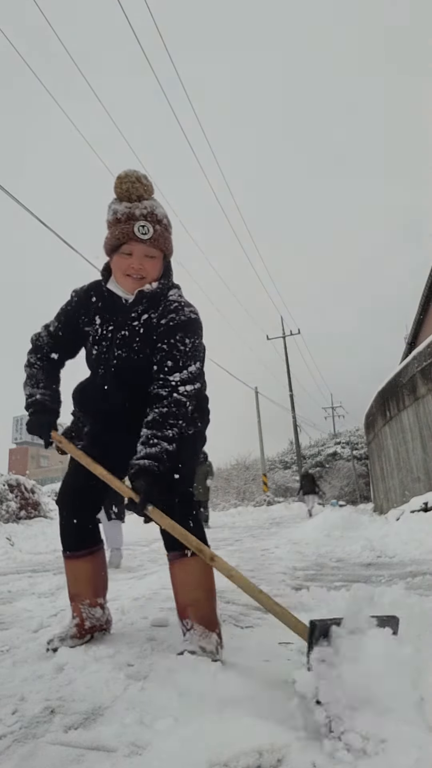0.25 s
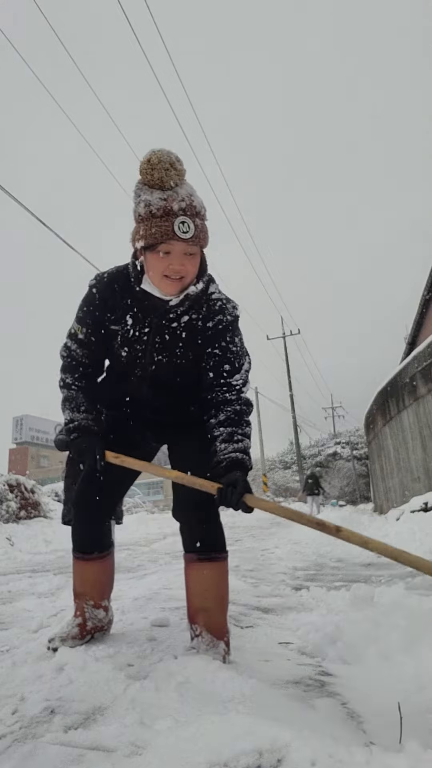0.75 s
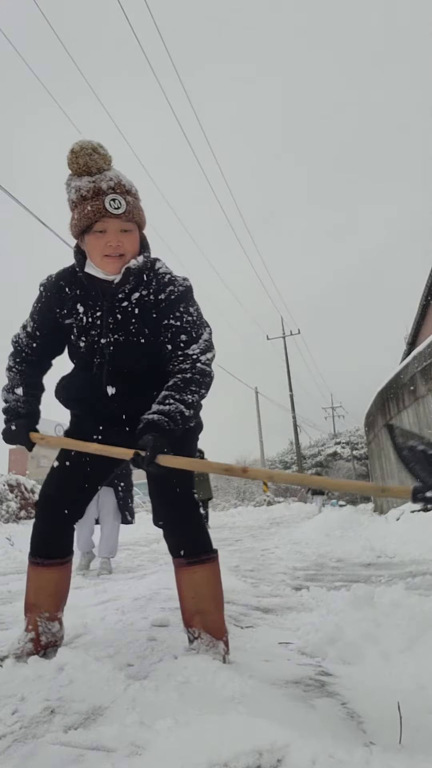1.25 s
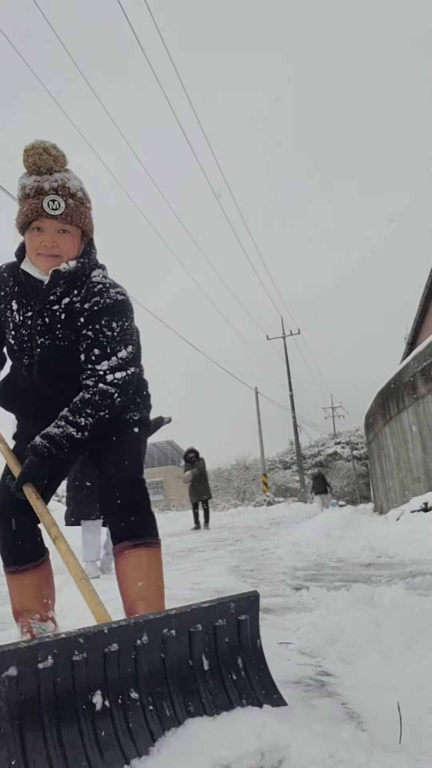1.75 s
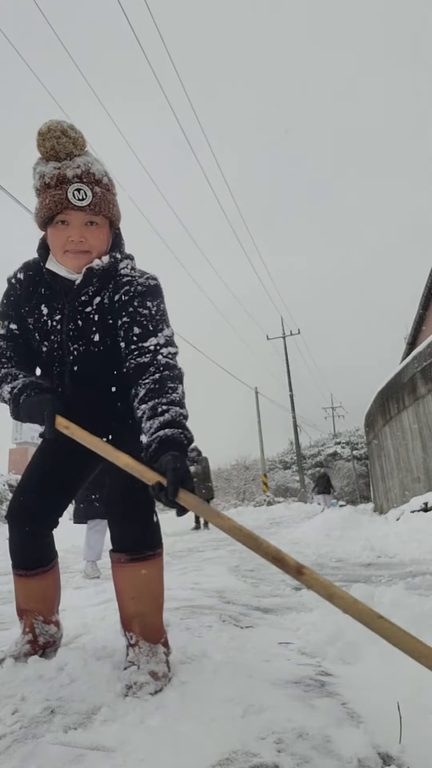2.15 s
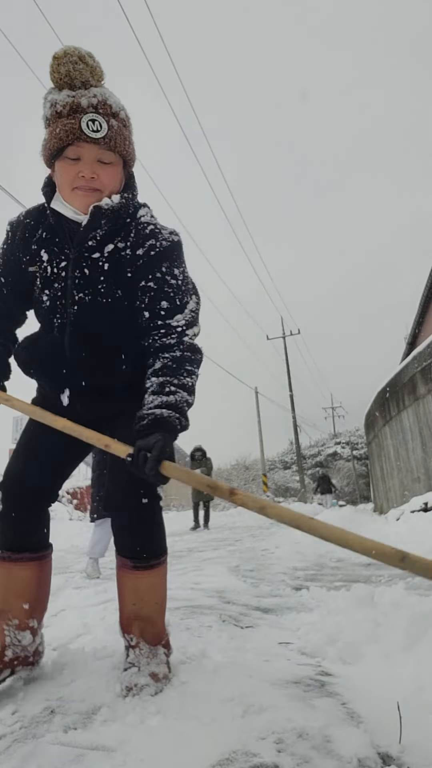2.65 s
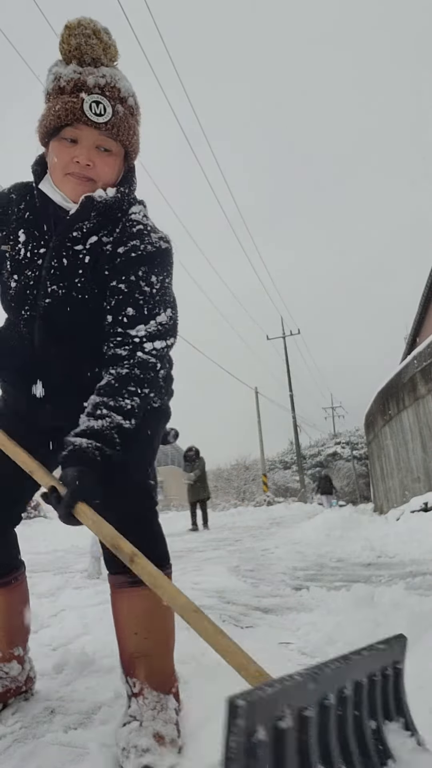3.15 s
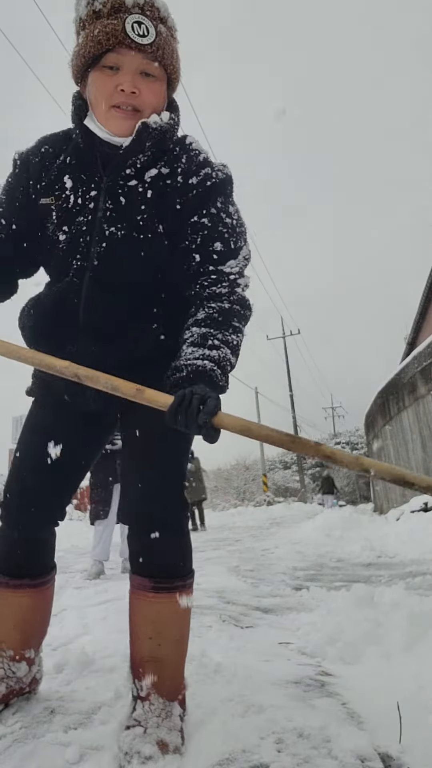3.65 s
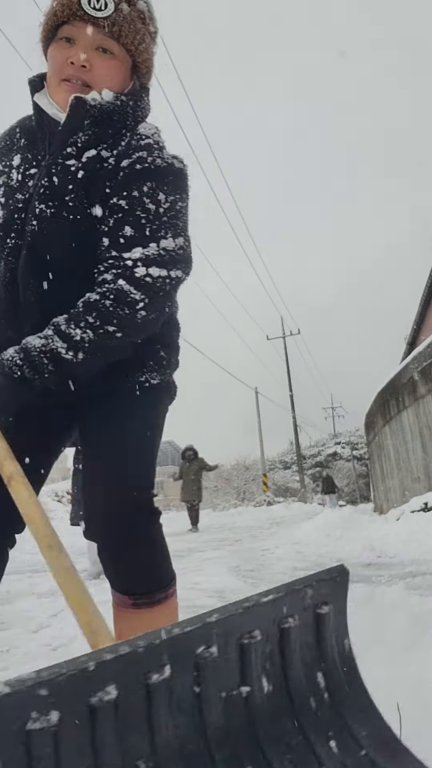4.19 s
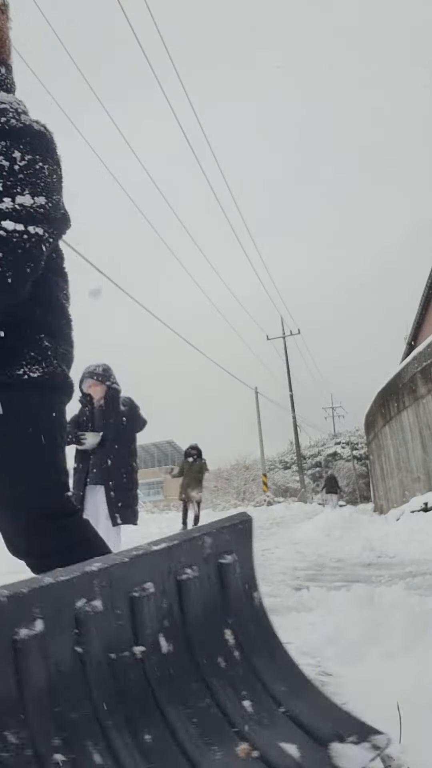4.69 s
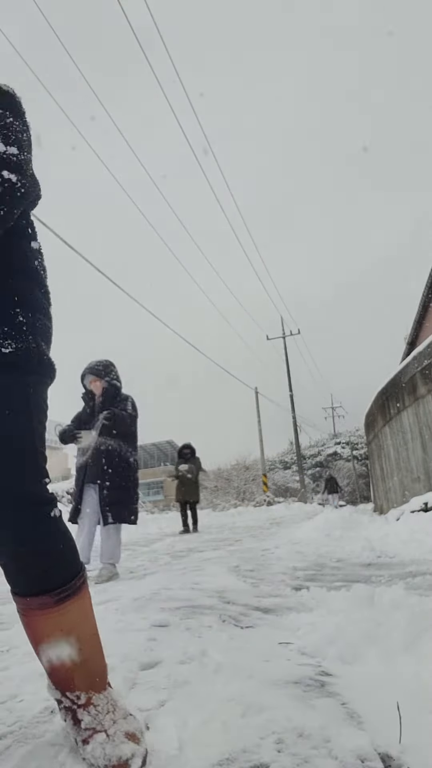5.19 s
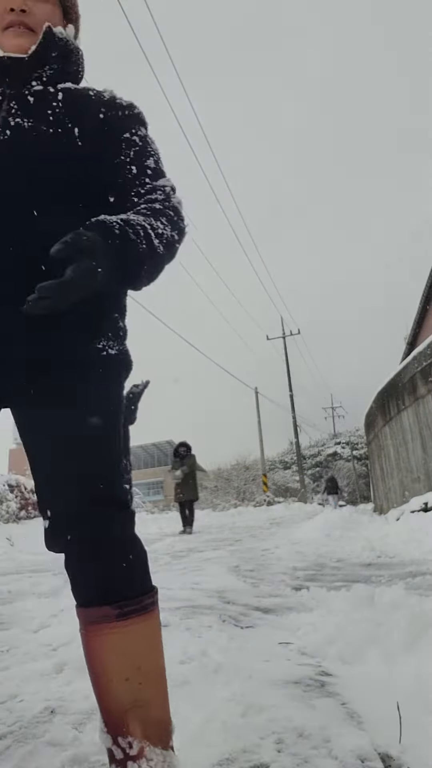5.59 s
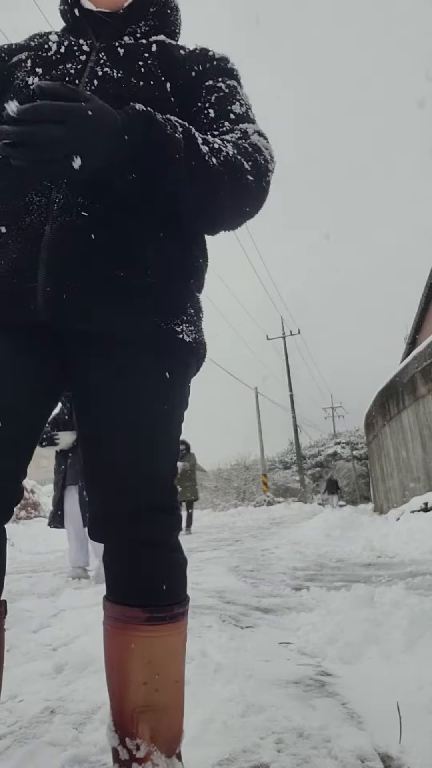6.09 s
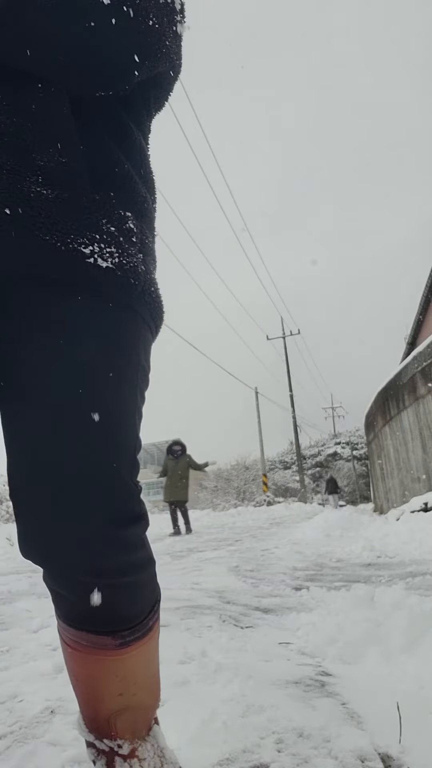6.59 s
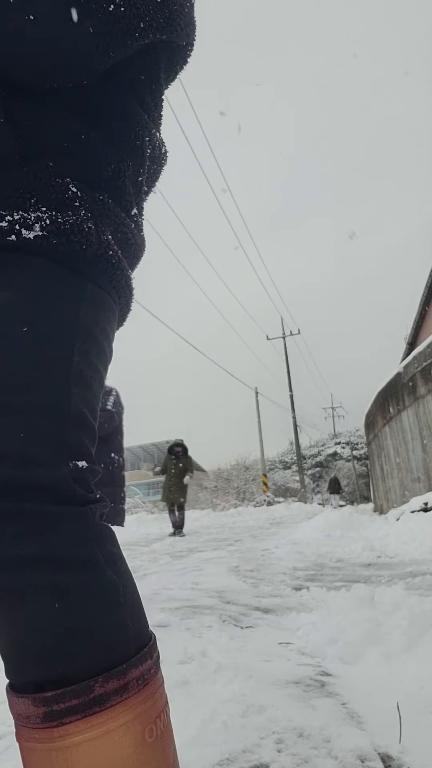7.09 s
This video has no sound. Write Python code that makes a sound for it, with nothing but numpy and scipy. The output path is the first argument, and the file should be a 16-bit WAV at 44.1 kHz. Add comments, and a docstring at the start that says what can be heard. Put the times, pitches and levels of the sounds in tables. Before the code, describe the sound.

Outdoors in quiet snowy air, a ribbed plastic blade grates, chirps and bumps through packed snow, followed by near, soft crunching footsteps.

```python
"""First a wide plastic pusher shoves snow along a road in four strokes, over a faint hush of open air.
Its edge sticks and slips on icy asphalt, which rings the blade; breaking crystals hiss and ice ticks.
Packed snow creaks in small jerks and gives way in thuds that ring the ground.
Then boots tread close by, further to the right: soles crackle on the crust and legs stir the air."""
import sys
import numpy as np
from scipy import signal
from scipy.fft import rfft, irfft, next_fast_len
from scipy.io import wavfile
from scipy.ndimage import uniform_filter1d

SR = 44100
rng = np.random.default_rng(int(sys.argv[2]) if len(sys.argv) > 2 else 0)


def generate_wav(signal):
    """Clip the signal to [-1, 1] and save it as 16-bit WAV at the path in sys.argv[1]."""
    frames = np.transpose(np.atleast_2d(signal))
    scaled = np.clip(frames, -1, 1) * 32767
    pcm = np.round(scaled).astype(np.int16)
    wavfile.write(sys.argv[1], SR, pcm)


N = 323694

# Table levels are relative: most sources trim them once more. Spectra only set the balance of a sound.
# faint background air: [f/Hz, level/dB per Hz]
AIR_SPECTRUM = [(25, -11.5), (75, 4.5), (160, -14.5), (233, -5.5), (331, -12.5), (567, -17), (1490, -27.5),
                (2490, -33), (3630, -41), (7300, -40.5), (9300, -51.5), (15500, -44)]
# the edge bites, slides and lifts:
# [t/s at full contact, rise/s, hold/s, fade/s, grating level/dB, crystal hiss level/dB, powder level/dB]
SCRAPES = [(0.0, .02, 0.014, 0.072, -33.5, -51, -70), (0.062, 0.044, 0.011, 0.031, -31, -44, -57),
           (0.125, 0.06, 0.032, 0.12, -25.5, -41.5, -48), (0.28, 0.36, 0.086, 0.29, -41, -49, -57.5),
           (0.5, 0.095, 0.083, .05, -54, -46.5, -72), (0.585, 0.13, 0.0039, 0.18, -50, -38, -68),
           (0.66, 0.08, 0.49, 0.8, -50, -56.5, -74), (1.61, 0.093, 0.015, 0.3, -54.5, -58.5, -66),
           (1.848, 0.081, 0.07, 0.1, -18.5, -28, -34), (1.96, 0.028, 0.0056, 0.15, -21, -32.5, -38),
           (2.06, 0.0054, 0.076, 0.11, -26, -37, -49), (2.29, 0.073, 0.033, 0.11, -36, -52, -72),
           (2.43, 0.98, 0.012, 0.2, -44.5, -53, -60), (2.656, 0.04, 0.0046, 0.1, -43, -51, -62),
           (2.84, 0.5, 0.0063, 0.12, -42.5, -60.5, -69), (2.996, 0.015, 0.01, 0.019, -36.5, -47.5, -80),
           (3.152, 0.024, 0.024, 0.03, -26, -41, -47), (3.186, 0.036, 0.0076, 0.038, -16, -29, -36),
           (3.26, 0.15, 0.016, 0.17, -27, -37, -44.5), (3.47, 0.23, 0.047, 0.22, -29.5, -43.5, -52),
           (3.8, 0.94, 0.02, 0.23, -93, -55.5, -64), (4.026, 0.0023, 0.022, 0.57, -29.5, -47.5, -61),
           (4.17, 0.033, 0.0035, 0.017, -30.5, -37, -58), (4.235, 0.099, 0.1, 0.15, -33.5, -38.5, -48),
           (4.39, 0.011, 0.0039, 0.02, -29, -43, -63), (4.455, 0.03, 0.0019, 0.071, -33, -34.5, -47),
           (4.64, 0.25, .15, 0.12, -52, -51, -60), (4.88, 0.06, 0.23, 0.13, -56, -66.5, -70)]
# resonances of the ribbed plastic blade: [f/Hz, width/Hz, level/dB]
BLADE_MODES = [(440, 277, 8), (708, 55, 12), (968, 133, 9.5), (1300, 270, 4.5), (1695, 320, 4.5),
               (2127, 133, 6), (2190, 440, 0.5), (2880, 330, -3.5), (3100, 370, -2.5), (4000, 600, -7)]
# the edge catches on ice and chirps:
# [t/s, level/dB, time to fall 60 dB/s, starting f/Hz, width/Hz, glide/octaves per s]
CATCHES = [(0.061, -20, 0.062, 3080, 700, -2), (0.126, -17, 0.15, 2720, 800, -1.5),
           (0.1674, -28, 0.03, 2650, 900, -2), (0.213, -17.5, 0.057, 2070, 280, 1),
           (0.2683, -22, 0.22, 2840, 800, 9), (1.841, -13, 0.076, 2580, 600, 9.5),
           (1.898, -14, 0.085, 3260, 700, -6), (1.957, -9.5, 0.05, 2840, 700, 0.5),
           (1.991, -12.5, 0.11, 3030, 600, -14.5), (2.058, -30, 0.11, 3430, 1800, 7),
           (2.991, -27, 0.045, 1740, 700, 1), (3.1343, -21, 0.064, 2800, 600, -0.5),
           (3.1747, -7, 0.081, 2700, 1100, -1.5), (3.1909, -0.5, 0.19, 2300, 1090, -5),
           (4.0224, -18, 0.016, 2880, 400, -6), (4.034, -20, 0.039, 2900, 400, -2),
           (4.034, -18.5, 0.065, 4360, 300, -7), (4.055, -20, 0.033, 2820, 300, 10),
           (4.089, -17, 0.043, 3350, 350, -3.5), (4.159, -21, 0.067, 3020, 350, 8),
           (4.205, -20, 0.07, 2820, 350, -1), (4.2226, -12.5, 0.019, 3160, 1010, -8),
           (4.229, -12.5, 0.036, 2270, 300, -12.5)]
# sharp tick of breaking ice: [f/Hz, level/dB per Hz]
TICK_SPECTRUM = [(700, 13.5), (1500, -0.5), (6500, -4.5), (8500, -10), (16000, -13)]
# hiss of breaking snow crystals: [f/Hz, level/dB per Hz]
HISS_SPECTRUM = [(800, -1.5), (2500, -7), (3800, 0), (4800, -1), (6800, 0.5), (8300, -8), (12000, -17),
                 (16000, -20)]
# the finest powder: [f/Hz, level/dB per Hz]
POWDER_SPECTRUM = [(4000, -87), (7500, -24), (9500, 2.5), (12000, 6), (15500, 0)]
# weight bears on the snow and eases off:
# [t/s at full load, rise/s, hold/s, fade/s, ground rumble level/dB, creak level/dB]
PRESSES = [(0.0, .05, 0.069, 0.061, -36.5, -39), (0.15, 0.032, 0.1, 0.084, -39.5, -37),
           (0.25, 0.1, 0.84, 0.6, -37, -47), (0.56, 1, 0.039, 0.44, -37, -40.5),
           (1.42, 0.14, 0.086, 0.054, -39, -59), (1.835, 0.074, 0.078, 0.091, -27, -21.5),
           (2.1, 0.22, 0.083, 0.19, -38, -29.5), (2.68, 0.01, 0.007, 0.14, -53, -32.5),
           (2.845, 0.031, 0.014, 0.087, -43, -46), (3.21, 0.068, 0.0034, 0.026, -26.5, -40),
           (3.3, 0.16, 0.11, .1, -51, -36.5), (3.5, 0.13, 0.027, 0.24, -26.5, -20.5),
           (3.73, 0.034, 0.0093, 0.071, -43, -27.5), (4.1, 0.075, 0.022, 0.067, -51, -35.5),
           (4.28, 0.018, 0.045, 0.25, -39, -35), (4.455, 0.0098, 0.0074, 0.022, -53, -34),
           (4.64, 0.042, 0.14, 0.18, -43, -43.5), (5.45, 0.12, 0.19, .1, -49, -52),
           (5.78, 0.31, 0.1, 0.12, -39.5, -35.5), (5.97, 0.091, 0.12, 0.2, -43.5, -42),
           (6.52, 0.38, 0.15, 0.77, -43, -42.5), (6.97, 0.13, 0.063, 0.28, -40, -39.5)]
# deep rumble of snow being packed: [f/Hz, level/dB per Hz]
RUMBLE_SPECTRUM = [(25, -73), (55, -1.5), (95, -10.5), (130, 7.5), (200, -2), (300, -5), (500, -19.5),
                   (1000, -61)]
# creaky grinding of snow being packed: [f/Hz, level/dB per Hz]
GRIND_SPECTRUM = [(60, -38), (150, -1.5), (330, 5), (540, 0.5), (720, -5), (1000, -17.5), (1500, -19.5),
                  (3000, -41)]
# cold snow creaks under a steady load: [t/s, length/s, level/dB, f/Hz]
CREAKS = [(0.156, 0.016, -30.5, 680), (0.209, 0.02, -29, 700), (1.926, 0.045, -19, 428),
          (4.223, 0.026, -34.5, 600), (4.639, 0.16, -45, 450), (5.364, 0.068, -34, 467),
          (6.55, 0.165, -39, 520), (6.629, 0.076, -35.5, 613), (6.696, 0.033, -32.5, 520)]
# crunch of packed snow: [f/Hz, level/dB per Hz]
CRUNCH_SPECTRUM = [(80, -6.5), (250, 1), (450, 1.5), (650, -3), (950, -13.5), (1500, -39), (2500, -40),
                   (6000, -67)]
# crack of the crust: [f/Hz, level/dB per Hz]
CRACK_SPECTRUM = [(400, -20), (900, 9), (1550, 2.5), (2300, -10.5), (3400, -12), (6500, -16), (8500, -22.5),
                  (16000, -25)]
# the blade bumps over a frozen lump: [t/s, level/dB]
KNOCKS = [(0.169, -18), (2.0155, -28), (2.134, -32), (2.286, -24.5), (2.325, -24), (2.653, -14),
          (2.657, -11.5), (3.356, -28), (3.411, -29), (3.463, -24), (3.498, -15), (3.518, -13),
          (3.5718, -11), (3.601, -19), (3.665, -23), (4.276, -19), (4.555, -29), (4.584, -35),
          (4.627, -31.5), (4.65, -33), (4.68, -31), (4.6907, -27.5)]
# snow gives way under blade, boot or a falling clod:
# [t/s, thump level/dB, thump f/Hz, crunch level/dB, crust crack level/dB]
THUDS = [(0.48, -12, 167, -14.5, -38.5), (0.521, -16.5, 176, -20, -51), (0.559, -23, 159, -19.5, -53),
         (0.661, -25, 143, -29, -52), (1.472, -26, 137, -62, -57), (1.755, -20.5, 128, -55, -62),
         (1.786, -12, 246, -16.5, -56), (1.821, -29, 161, -20, -32), (1.865, -27, 151, -20, -44),
         (1.934, -13.5, 194, -19, -40), (1.981, -15.5, 203, -15, -40), (2.014, -27, 270, -15.5, -32),
         (2.032, -38, 220, -28, -34), (2.106, -34, 275, -16.5, -28.5), (2.131, -23, 233, -16.5, -36),
         (2.187, -26.5, 214, -20.5, -33), (2.222, -19.5, 135, -35, -40), (2.646, -15.5, 170, -20.5, -38),
         (2.6509, -8, 162, -9.5, -23), (2.6565, -13.5, 161, -8.5, -26), (2.671, -26, 198, -20, -47),
         (3.228, -20, 252, -16.5, -24.5), (3.358, -14, 143, -29.5, -33.5), (3.478, -11, 193, -35, -31),
         (3.483, -6, 140, -34, -28), (3.556, -7, 172, -8, -22.5), (3.606, -21, 140, -17.5, -30),
         (3.652, -23, 192, -11.5, -24.5), (3.68, -19, 137, -20, -32), (4.217, -29, 115, -40, -54),
         (4.274, -12, 113, -13, -29), (4.565, -29.5, 212, -25.5, -34.5), (4.633, -27.5, 157.6, -32.5, -37),
         (4.699, -29, 217, -31, -50), (5.29, -30, 130, -48, -72), (5.313, -22.5, 85, -26, -35.5),
         (5.365, -20.5, 72, -17, -27.5), (5.564, -21, 291, -19, -40.5), (5.77, -28, 133, -41, -54),
         (5.863, -19, 123, -29.5, -41.5), (5.957, -24.5, 144, -47.5, -41), (6.308, -19, 120, -34.5, -47),
         (6.6401, -18, 300, -23.5, -38), (6.783, -34, 161, -28.5, -47), (7.101, -18, 123, -27, -60)]
# single bits of ice snap: [t/s, level/dB, f/Hz, gain of the ring against the dry tick, pan to the left/dB]
SNAPS = [(0.5368, -23, 4160, 3.2, 0), (0.928, -27.5, 4300, 10, 4), (1.438, -38, 3600, 7.2, -2),
         (2.267, -29.5, 2130, 6, -2), (2.765, -30, 3460, 4.6, -1), (2.852, -27.5, 2530, 14, 1),
         (3.3097, -23, 3430, 6.3, -3), (3.4785, -12.5, 1650, 2.1, 1), (3.545, -15, 1520, 3.1, -5),
         (3.6069, -14.5, 1500, 2.1, 5), (4.0235, -22.5, 4200, 25, 1), (5.366, -13, 4320, 1.1, -4),
         (5.3794, -20, 2460, 1.8, 9), (5.3927, -24, 4020, 1.1, 1), (5.565, -22.5, 2000, 14, -0.5),
         (5.7256, -21, 2300, 4.7, -1), (5.747, -27, 4700, 11, 1), (5.77, -29, 2300, 7, -2),
         (5.809, -19, 4700, 2.7, 1), (5.9204, -30, 4580, 5.5, 0), (6.066, -26.5, 1710, 4.3, -7),
         (6.4983, -33, 2900, 4.1, 0)]
# a boot scuffs over the crust:
# [t/s at full contact, rise/s, hold/s, fade/s, scuff level/dB, crystal hiss level/dB, powder level/dB]
STEPS = [(5.317, .005, 0.032, 0.19, -46.5, -51.5, -56), (5.368, 0.0058, 0.011, 0.039, -47, -39, -43),
         (5.44, 0.094, 0.06, 0.18, -50, -60.5, -66), (5.6, 0.087, 0.05, 0.17, -39.5, -49.5, -53),
         (5.73, 0.043, 0.086, 0.66, -38, -44, -57), (6.06, 0.017, 0.0098, 0.068, -37, -41, -57),
         (6.14, 0.27, 0.013, 0.11, -54, -60.5, -60), (6.31, 0.11, 0.34, 0.32, -52, -57.5, -63.5),
         (6.64, 0.055, 0.075, 0.15, -49, -65, -63), (6.84, 0.07, 0.0071, 0.083, -51, -51, -52),
         (6.97, 0.1, 0.011, 0.24, -41.5, -46.5, -50.5), (7.09, 0.063, 0.0076, 0.096, -39.5, -46, -47.5),
         (7.285, 0.14, 0.021, 0.047, -49.5, -51, -47.5)]
# resonances of a rubber boot on the crust: [f/Hz, width/Hz, level/dB]
BOOT_MODES = [(760, 300, -1), (1342, 36, 1.5), (1590, 130, 1.5), (2280, 440, -1.5), (3120, 230, -8.5),
              (4040, 4900, -37)]
# puffs of air stirred by the legs: [f/Hz, level/dB per Hz]
STIR_SPECTRUM = [(20, 1), (50, -6), (90, -10), (200, -39), (1000, -74)]

AIR_DB = -49.5   # level of the shared sound and of the side difference before its bass is cut
PORT_LAG_S = .00034   # the left port hears the pusher later
CUTOFF_HZ = 16000
SWELL_DB = 25   # rise and fade times count over this range
SLIPS_PER_S, CATCH_RISE_S, SPLINTER_SHARE = 1500, 0.00083, 0.3   # the stutter within one catch
PARTNER_RATIO, PARTNER_SHARE = 0.69, 0.5   # a weaker, lower resonance rings with each chirp
LOOSE_PER_S, LOOSE_DB = 24, -19   # stray grains of ice, relative to the hiss
PELLETS_PER_S, PELLET_DB, PELLET_SPREAD_DB = 130, -16, -1   # level relative to the rubbing
PELLET_BAND_HZ, PELLET_WIDTH_HZ = (770, 3900), 310
KNOCK_BAND_HZ = (870, 2030)   # the part of the blade's ring that a blunt contact reaches
GROUND_HZ = 129.3   # the packed layer's own deep bounce
CRUNCH_HZ, ICINESS_DB_PER_OCTAVE = 560, 45   # icy snow, with more crack than thump, crunches higher
CRUNCH_FADE_S, BRITTLE_DB_PER_HALVING = 0.067, 23   # icy snow also crunches more briefly
WALK_S, WALK_PAN_DB = 5.25, 1.4   # from then on ground sounds gain this on the right and lose it on the left
SPARKLE_PER_S, SPARKLE_DB, SPARKLE_BAND_HZ = 54, -7, (4040, 5200)   # level relative to the hiss under a boot
STIR_DB, STIR_FOLLOWS = -10.5, 0.79   # air stirred by the legs; share of the scuff's swing


def from_db(db):
    """Turn decibels into gain."""
    return 10 ** (np.asarray(db) / 20)


def rms_one(x):
    """Scale to unit power."""
    return x / np.sqrt(np.mean(x ** 2) + 1e-20)


def unit_blow(x):
    """Scale a short sound to the energy of 10 ms at unit power."""
    return x / np.sqrt(np.sum(x ** 2) / (SR / 100) + 1e-20)


def add(track, s, sound):
    """Mix a sound into a track from time s."""
    start = max(round(s * SR), 0)
    track[..., start:start + sound.shape[-1]] += sound[..., :N - start]


def drift(rate):
    """Wander at random with spread 1, drawing about `rate` new values a second and joining them by lines."""
    knots = rng.standard_normal(N // 20)
    return np.interp(np.arange(N) * rate / SR, np.arange(len(knots)), knots)


def swells(rows):
    """Each contact rises, holds and fades, and overlaps add in power: one dB curve per level column."""
    t, power = np.arange(0, N, 16) / SR, 1e-12
    for s, rise_s, hold_s, fade_s, *levels_db in rows:
        before = (s - t) / max(rise_s, .002)
        after = (t - s - hold_s) / max(fade_s, .002)
        drop_db = SWELL_DB * np.clip(np.maximum(before, after), 0, 10)
        power = power + from_db(np.array(levels_db)[:, None] - drop_db) ** 2
    return [np.interp(np.arange(N) / SR, t, 10 * np.log10(p)) for p in power]


def colour(x, spectrum):
    """Filter to a given spectrum without sounding early (minimum phase); white input keeps its power."""
    size = 2 * next_fast_len(x.shape[-1] // 2 + 2048)
    hz, db = np.transpose(spectrum)
    bins_hz = np.fft.rfftfreq(size, 1 / SR)
    gain = rms_one(from_db(np.interp(np.log(bins_hz + 1), np.log(hz), db)))
    # folding the cepstrum forward gives the minimum-phase filter
    cepstrum = irfft(np.log(gain))[:size // 2]
    cepstrum[1:] *= 2
    response = np.exp(rfft(cepstrum, size))
    return irfft(rfft(x, size) * response)[..., :x.shape[-1]]


def resonate(x, hz, width_hz):
    """Ring one resonance, with about gain 1 at its top."""
    r = np.exp(-np.pi * width_hz / SR)
    feed = np.array([1, 0, -1]) * (1 - r * r) / 2
    back = [1, -2 * r * np.cos(2 * np.pi * hz / SR), r * r]
    return signal.lfilter(feed, back, x + 1e-18)


def shifting(x, modes, wander_db, rate):
    """Resonances wax and wane as the point of contact moves; white input keeps its power."""
    impulse = np.eye(1, 4096)[0]
    out, body = 0, 0
    for k, (hz, width_hz, db) in enumerate(modes):
        gain = (-1) ** k * from_db(db)
        wander = rms_one(from_db(wander_db * np.clip(drift(rate), -2, 2)))
        out = out + gain * resonate(x * wander, hz, width_hz)
        body = body + gain * resonate(impulse, hz, width_hz)
    return out / np.linalg.norm(body)


def steady(x, span_s):
    """Even out the slow level and keep the grain."""
    size = max(int(span_s * SR), 2)
    power = uniform_filter1d(uniform_filter1d(x ** 2, size), size)
    return x / np.sqrt(np.abs(power) + 1e-12)


def fractures(per_s, spread_db, size=N):
    """Tiny breaks at random moments, with random sign and strength."""
    happens = rng.random(size) < per_s / SR
    sign = rng.choice([-1, 1], size)
    return happens * sign * from_db(spread_db * np.clip(rng.standard_normal(size), -2, 2))


def burst(fade_s, per_s, rise_s):
    """A quick run of fractures that falls 60 dB in fade_s (4 ms at least), scaled as a unit blow."""
    t = np.arange(SR // 5) / SR
    fade = from_db(-60 * t / max(fade_s, .004))
    rise = 1 - np.exp(-t / rise_s)
    return unit_blow(fractures(per_s, 1.0, size=len(t)) * fade * rise)


def ports(direct, scattered, pan_db, spread, lag_s):
    """Left and right: both come late to the left, and the scattered part has opposite signs on the sides."""
    n = np.arange(N)
    late_n = n - round(lag_s * SR)
    late_direct = np.interp(late_n, n, direct, left=0)
    late_scattered = np.interp(late_n, n, scattered, left=0)
    pair = np.array([late_direct + spread * late_scattered, direct - spread * scattered])
    # a positive pan makes the left louder
    return pair / np.sqrt(1 + spread ** 2) * from_db([[pan_db / 2], [-pan_db / 2]])


def still_air():
    """The faint hush of a snowy road, alike on both sides in the bass, and a light draught on each port."""
    mid, side = colour(rng.standard_normal((2, N)), AIR_SPECTRUM)
    side = signal.sosfilt(signal.butter(1, 700, "high", fs=SR, output="sos"), side)
    draught_spectrum = [(15, -21), (55, 14), (110, -25), (300, -35.0), (2000, -90)]
    draught = colour(rng.standard_normal((2, N)), draught_spectrum)
    draught_gain = from_db(-59.0 + 2 * drift(16.0))
    return from_db(AIR_DB) * np.array([mid + side, mid - side]) + draught_gain * draught


def blade(grate_db):
    """The edge sticks and slips over grit; each slip rings the blade's damped modes."""
    judder = from_db(2.4 * drift(130) + 3.5 * drift(49))
    halves = []
    for _ in range(2):   # the near and the far half of the edge grate independently
        slips = steady(fractures(1100, 0.68) * judder, 0.042) * from_db(grate_db - 4.5)
        grating = shifting(slips, BLADE_MODES, wander_db=4.0, rate=36)
        halves.append(grating + chirps())
    return ports(*halves, pan_db=-4.0, spread=0.15, lag_s=PORT_LAG_S)


def crystals(hiss_db, powder_db):
    """Snow crystals shear in clumps: a dense rush under a hard shove, single ticks when the snow settles."""
    clumps = from_db(2.36 * drift(260) + 1.85 * drift(60))
    per_s = 3500 * from_db(0.32 * (hiss_db + 39.0))
    halves = []
    for _ in range(2):
        coarse, fine = [steady(fractures(per_s, 3.2) * clumps, 0.055) for _ in range(2)]
        fine = 0.27 * coarse + 0.9 * fine   # each break also sheds some powder
        hiss = colour(coarse * from_db(hiss_db), HISS_SPECTRUM)
        powder = colour(fine * from_db(powder_db), POWDER_SPECTRUM)
        halves.append(hiss + powder)
    return ports(*halves, pan_db=3.0, spread=1.0, lag_s=PORT_LAG_S)


def packing(rumble_db, creak_db):
    """Snow compacts in small jerks with lulls between, heard dull and near the centre through the ground."""
    jerks = from_db(2.0 * drift(90))
    rumble, grind = [], []
    for _ in range(2):
        deep = colour(fractures(600, 5.7), RUMBLE_SPECTRUM)
        rumble.append(steady(deep, 0.048) * from_db(rumble_db + 3.0))
        rough = colour(fractures(450, 2.3) * jerks, GRIND_SPECTRUM)
        grind.append(steady(rough, 0.036) * from_db(creak_db - 1.0))
    rumble_pair = ports(*rumble, pan_db=0.5, spread=0.083, lag_s=0)
    return rumble_pair + ports(*grind, pan_db=-2.0, spread=0.21, lag_s=0)


def loose_grains(hiss_db):
    """Wherever snow is moved, stray grains of ice break off and tick."""
    breaks = fractures(LOOSE_PER_S, 3.4) * from_db(hiss_db + LOOSE_DB)
    halves = []
    for _ in range(2):
        tick = burst(0.0053, 7200, 0.00019)
        halves.append(colour(signal.oaconvolve(breaks, tick)[:N], HISS_SPECTRUM))
    return np.array(halves) * from_db([[1], [-1]])


def pellets(level_db, per_s, band_hz):
    """Lumps of ice burst under the edge or the sole, each with a short ring at one of ten pitches."""
    out, pitches = np.zeros((2, N)), np.geomspace(*band_hz, 10)
    for hz in pitches:
        breaks = fractures(per_s / len(pitches), PELLET_SPREAD_DB) * from_db(level_db)
        for side in out:
            ring = unit_blow(resonate(burst(0.0062, 9000, 0.00014), hz, PELLET_WIDTH_HZ))
            side += signal.oaconvolve(breaks, ring)[:N]
    return ports(*out, pan_db=-0.5, spread=0.65, lag_s=PORT_LAG_S)


def chirps():
    """A catching edge stutters and rings two resonances that glide as contact shifts; splinters rasp."""
    out = np.zeros(N)
    for s, db, fade_s, hz, width_hz, glide in CATCHES:
        catch = burst(fade_s, SLIPS_PER_S, CATCH_RISE_S)
        upper, lower = [unit_blow(resonate(resonate(catch, f, width_hz), f, 2 * width_hz))
                        for f in (hz, hz * PARTNER_RATIO)]
        ring = upper + PARTNER_SHARE * lower
        n = np.arange(len(ring))
        speed = 2 ** (glide * np.minimum(n / SR, .04))   # the pitch glides for 40 ms, then stays
        gliding = np.interp(np.cumsum(speed), n, ring, right=0)
        rasp = SPLINTER_SHARE * colour(catch, TICK_SPECTRUM)
        add(out, s, (unit_blow(gliding) + rasp) * from_db(db - 18.5))
    return out


def creaks():
    """Grains let go in a nearly regular stutter that rings the packed layer; each slip also cracks faintly."""
    out = np.zeros(N)
    for s, length_s, db, hz in CREAKS:
        size = int(max(length_s, .01) * SR)
        # about 110 slips a second: one each time the count passes a whole number
        turns = np.cumsum(110 * from_db(3 * drift(150)[:size])) / SR
        slips = np.diff(np.floor(turns), prepend=-1) * from_db(2.1 * rng.standard_normal(size))
        slips = slips * np.hanning(size) ** 0.059
        slips = np.pad(slips, (0, SR // 20))   # room to ring on
        jerks = colour(slips, CRUNCH_SPECTRUM)
        ring = jerks + 3.5 * resonate(jerks, hz, 56) + 0.083 * colour(slips, CRACK_SPECTRUM)
        add(out, s, ring / np.sqrt(np.sum(ring ** 2) / size + 1e-20) * from_db(db))
    return out * from_db([[-.8], [.8]])


def knocks():
    """A blunt bump rings the blade's middle modes hollowly, with a new balance every time."""
    blows = np.zeros(N)
    for s, db in KNOCKS:
        add(blows, s, burst(0.0053, 4000, 0.0001) * from_db(db - 8.5))
    blunt = signal.sosfilt(signal.butter(3, KNOCK_BAND_HZ, "band", fs=SR, output="sos"), blows)
    halves = [shifting(blunt, BLADE_MODES, wander_db=1.5, rate=55) for _ in range(2)]
    return ports(*halves, pan_db=-5.5, spread=0.1, lag_s=0.0003)


def thuds():
    """A collapse crunches in a few jerks, cracks the crust and, a moment later, thumps the ground."""
    ground, packed, crust = np.zeros(N), np.zeros((2, N)), np.zeros((2, N))
    push = unit_blow(np.eye(1, SR // 5)[0])   # a single click
    for s, thump_db, thump_hz, crunch_db, crack_db in THUDS:
        iciness_db = crack_db - thump_db
        crunch_hz = CRUNCH_HZ * 2 ** (iciness_db / ICINESS_DB_PER_OCTAVE)
        fade_s = CRUNCH_FADE_S * 2 ** ((-iciness_db - 14.0) / BRITTLE_DB_PER_HALVING)
        load = push + 0.92 * burst(0.12, 600, 0.007)
        thump = resonate(resonate(load, thump_hz, 80), thump_hz, 260)
        bounce = resonate(resonate(load, GROUND_HZ, 30), GROUND_HZ, 150)
        low = unit_blow(unit_blow(thump) + 0.55 * unit_blow(bounce))
        add(ground, s + 0.002047, low * from_db(thump_db - 4.0))
        for side in packed:
            crunch = colour(push + 2.9 * burst(fade_s, 700, 0.00019), CRUNCH_SPECTRUM)
            crunch = unit_blow(crunch + 1.9 * resonate(crunch, crunch_hz, 137))
            add(side, s + 0.00068, -crunch * from_db(crunch_db - 2.5))
        for side in crust:
            crack = unit_blow(0.95 * push + burst(0.08, 700, 0.00012))
            add(side, s + 0.00107, crack * from_db(crack_db))
    thumps = ground * from_db([[-.3], [.3]])
    crunches = ports(*packed, pan_db=-2.0, spread=0.1, lag_s=0.0001)
    cracks = ports(*colour(crust, CRACK_SPECTRUM), pan_db=-4.5, spread=0.64, lag_s=0.00017)
    return thumps + crunches + cracks


def snaps():
    """Brittle ice: a sharp tick with a brief ring of its own."""
    out = np.zeros((2, N))
    for s, db, hz, ring, pan_db in SNAPS:
        for side, lean in zip(out, (.5, -.5)):
            tick = colour(burst(0.02, 5400, 0.00015), TICK_SPECTRUM)
            snap = unit_blow(tick + ring * resonate(tick, hz, 470))
            add(side, s, snap * from_db(db - 9.5 + lean * pan_db))
    return out


def boots(scuff_db):
    """Soles grind the crust into a sparse crackle, close by on the right."""
    halves = []
    for _ in range(2):
        grit = steady(fractures(400, 3.0), 0.07) * from_db(scuff_db - 4.0)
        halves.append(shifting(grit, BOOT_MODES, wander_db=6.0, rate=40))
    return ports(*halves, pan_db=-6.0, spread=0.55, lag_s=0.00027)


def stirred_air(scuff_db):
    """Legs moving close by push slow puffs of air against each port."""
    puffs = colour(rng.standard_normal((2, N)), STIR_SPECTRUM)
    return puffs * from_db(STIR_DB + STIR_FOLLOWS * scuff_db)


def scene():
    """Snow swallows all echoes, so the sources just add."""
    grate_db, *blade_snow_db = swells(SCRAPES)
    scuff_db, *boot_snow_db = swells(STEPS)
    hiss_db, powder_db = np.maximum(blade_snow_db, boot_snow_db)
    walking = np.arange(N) / SR > WALK_S
    walk_pan = from_db(WALK_PAN_DB * walking * np.array([[-1], [1]]))
    ground = (packing(*swells(PRESSES)) + creaks() + thuds()) * walk_pan
    lumps = pellets(np.maximum(grate_db, scuff_db) + PELLET_DB, PELLETS_PER_S, PELLET_BAND_HZ)
    sparkle = pellets(boot_snow_db[0] + SPARKLE_DB, SPARKLE_PER_S, SPARKLE_BAND_HZ)
    snow = crystals(hiss_db, powder_db) + loose_grains(hiss_db) + lumps + sparkle + snaps()
    pusher = blade(grate_db) + knocks()
    walker = boots(scuff_db) + stirred_air(scuff_db)
    return still_air() + pusher + snow + ground + walker


def record(dry):
    """The microphone drops the deepest bass; the highest peaks are clipped, then the top is cut."""
    thinned = signal.sosfilt(signal.butter(2, 38, "high", fs=SR, output="sos"), dry)
    top_cut = signal.ellip(10, .1, 80, CUTOFF_HZ, fs=SR, output="sos")
    return signal.sosfilt(top_cut, np.clip(thinned, -1, 1))


dry = scene()
out = record(dry)
generate_wav(out)
```